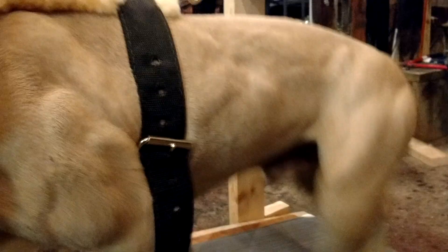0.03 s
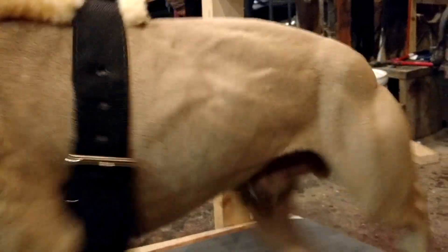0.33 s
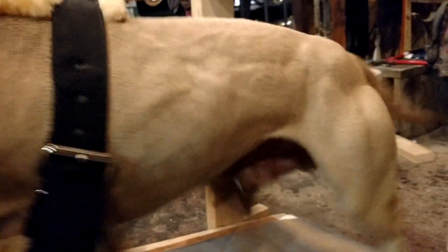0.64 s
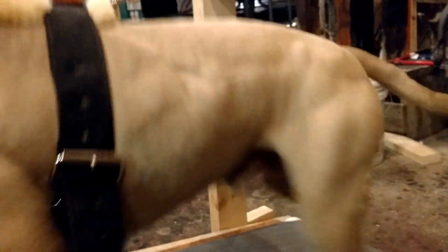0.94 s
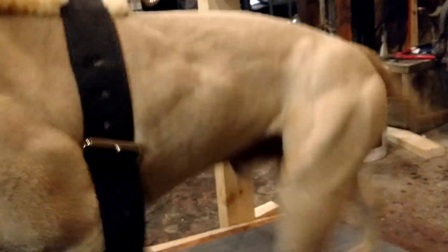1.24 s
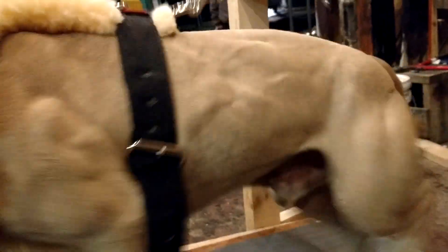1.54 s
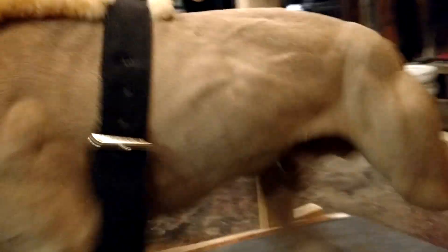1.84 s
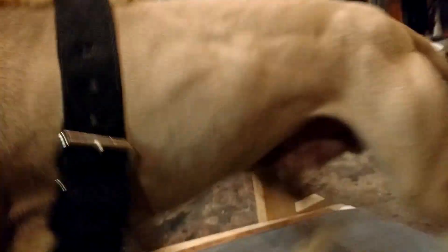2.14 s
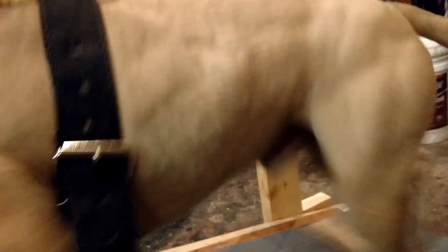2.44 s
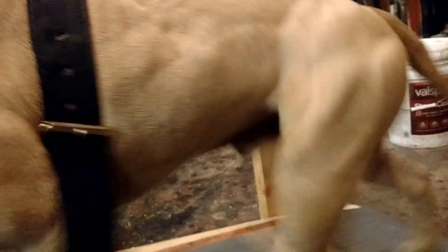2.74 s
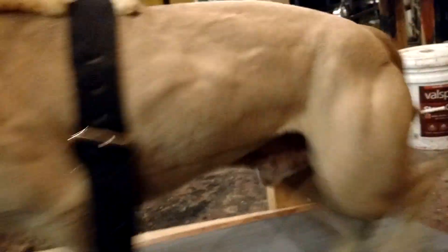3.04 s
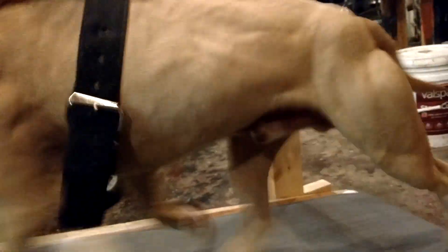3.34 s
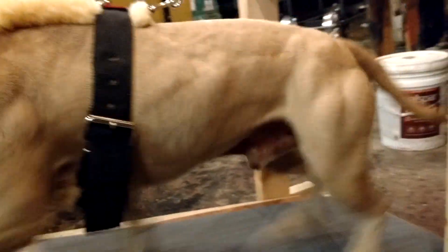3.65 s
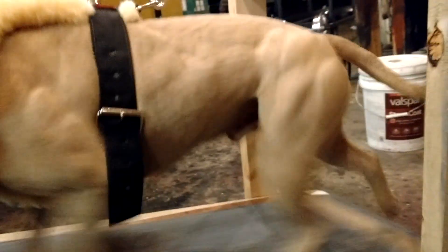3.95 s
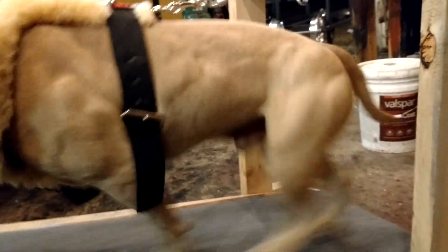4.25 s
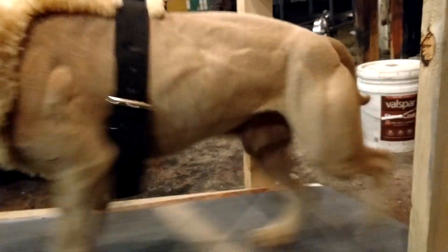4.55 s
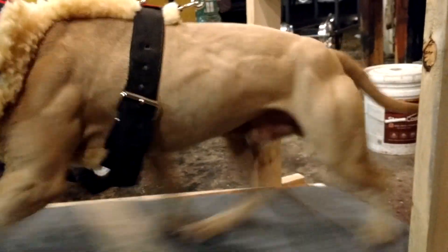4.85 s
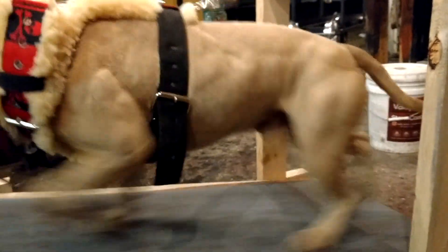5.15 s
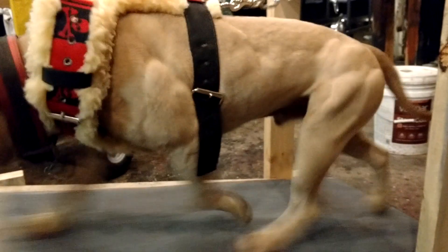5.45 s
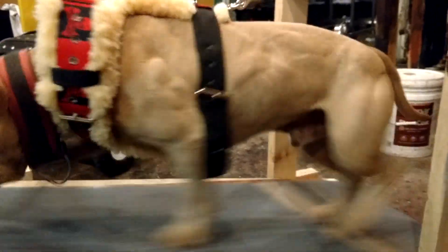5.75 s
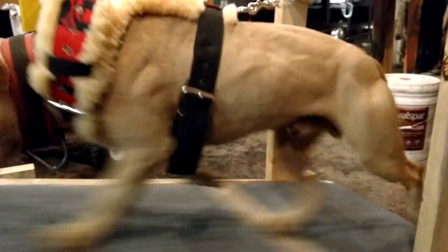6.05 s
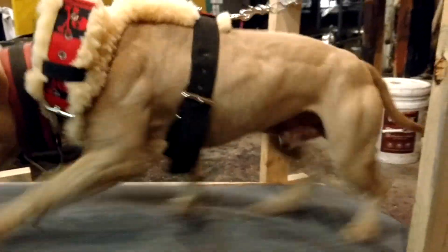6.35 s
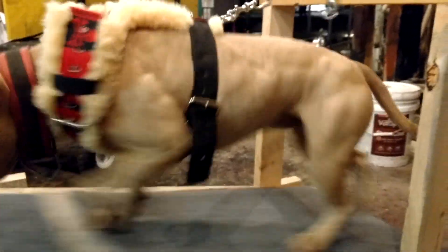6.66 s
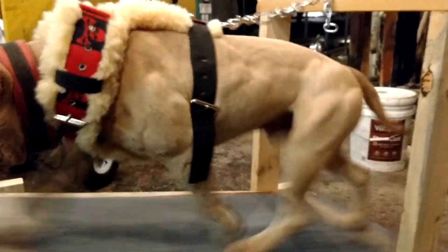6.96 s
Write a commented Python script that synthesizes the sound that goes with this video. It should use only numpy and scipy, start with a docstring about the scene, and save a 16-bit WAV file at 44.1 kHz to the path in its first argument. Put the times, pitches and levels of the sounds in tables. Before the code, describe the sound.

A dog trots on a loud, rattling treadmill, with quick rhythmic paw beats, belt hiss, and scattered clicks and knocks.

```python
"""Dog on a workshop treadmill.

A dog trots on a free-running belt that rattles over its wooden bed and hisses. Each paw drives the
rattle harder and scuffs; hard landings knock on the bed. Claws and harness hardware clack, steel rings
ping. The sound swells and drops abruptly about once a second. A close camera with a widened stereo
image draws back: the bass thins and the bed's boxy note comes forward."""
import sys
import numpy as np
from scipy import signal
from scipy.fft import rfft, irfft, next_fast_len
from scipy.io import wavfile
from scipy.ndimage import uniform_filter1d, map_coordinates

SR = 44100
rng = np.random.default_rng(int(sys.argv[2]) if len(sys.argv) > 2 else 0)


def pcm_store(signal):
    """Save signal as 16-bit PCM."""
    levels = np.round(np.clip(np.atleast_2d(signal), -1, 1) * 32767)
    wavfile.write(sys.argv[1], SR, levels.astype(np.int16).T)


N = 317079
TIME_S = np.arange(N) / SR


def amp(db):
    """Decibels to gain."""
    return 10 ** (np.asarray(db) / 20)


def unit_rms(x):
    """x scaled to rms 1."""
    return x / np.sqrt(np.mean(x ** 2) + 1e-20)


def at_hz(rows, hz):
    """(Hz, value) rows interpolated on a log frequency axis."""
    row_hz, values = np.transpose(rows)
    return np.interp(np.log(hz + 1), np.log(row_hz + 1), values)


def curve(rows):
    """(s, value) rows as one value per sample."""
    return np.interp(TIME_S, *np.transpose(rows))


def peak(hz, centre_hz, width_hz):
    """Resonance curve of height 1."""
    return 1 / (1 + (2 * (hz - centre_hz) / width_hz) ** 2)


def wobble(knots_per_s):
    """Smooth random curve."""
    return map_coordinates(rng.standard_normal(400), [TIME_S * knots_per_s], mode="mirror")


def filtered(x, response):
    """x through a frequency response."""
    size = x.shape[-1]
    padded = next_fast_len(size + 4096)
    hz = np.fft.rfftfreq(padded, 1 / SR)
    return irfft(rfft(x, padded) * response(hz), padded)[..., :size]


def patchy(x, depth_db, bands):
    """x under slow random patches of gain over time and frequency, at rms 1."""
    spectra = signal.stft(x, nperseg=512)[2]
    patches = uniform_filter1d(rng.standard_normal(spectra.shape[1:]), size=bands, axis=0)
    patches = unit_rms(uniform_filter1d(patches, size=12, axis=1))
    return unit_rms(signal.istft(spectra * amp(depth_db * patches))[1][:, :N])


# Likeness of the two microphones. Each row: frequency in Hz, coherence.
COHERENCE = [(30, 0.34), (70, 0.16), (150, 0.58), (500, 0.7), (800, 0.64), (1150, -0.33), (1600, -0.16),
             (5000, 0.068), (9000, -0.043)]

def noise(colour_db, size):
    """Coloured stereo noise of rms 1, most alike in the low mids."""
    def mid_side_gains(hz):
        angle = np.arccos(np.clip(at_hz(COHERENCE, hz), -1, 1)) / 2
        return amp(colour_db(hz)) * [np.cos(angle), np.sin(angle)]
    mid, side = filtered(rng.standard_normal((2, size)), mid_side_gains)
    return unit_rms(np.array([mid + side, mid - side]))


def tail(t60_rows, size):
    """Stereo impulse response of energy 1; each frequency dies at its own speed."""
    hz, t, spectra = signal.stft(noise(np.zeros_like, size), SR, nperseg=256)
    t60_s = at_hz(t60_rows, hz)[:, None]
    ring = signal.istft(spectra * amp(-60 * t / t60_s) / np.sqrt(t60_s), SR)[1]
    return unit_rms(ring) / np.sqrt(ring.shape[1])


def burst(colour_db, t60_s, attack_s, size):
    """Stereo noise with the energy of its envelope: quick rise, exponential decay."""
    t = np.arange(size) / SR
    envelope = amp(-60 * t / t60_s) * (1 - np.exp(-t / attack_s))
    return unit_rms(envelope * noise(colour_db, size)) * np.sqrt(np.mean(envelope ** 2))


def add_at(out, start_s, sound):
    """Mix sound into out, cut at the end."""
    span = out[:, round(start_s * SR):][:, :sound.shape[1]]
    span += sound[:, :span.shape[1]]


# Swells. Each row: start in s, first gain in dB, last gain in dB, bend (below 1 moves early, above 1
# late), length of the closing drop in s.
SWELLS = [(0.078, -36.5, -39, 0.79, 0.0094), (0.94, -44, -39.5, 0.7, 0.023),
          (1.44, -47.5, -35.5, 0.93, 0.045), (2.595, -46.5, -37, 0.6, 0.013),
          (3.657, -49, -38.5, 0.74, 0.017), (4.819, -48, -38, 0.39, 0.016), (5.903, -46.5, -36, 4.1, 0.013),
          (6.64, -41.5, -44.5, 0.92, 0.02)]

def swell_db(fade_db=24, fade_s=0.11):
    """Gain that fades in, then repeatedly climbs and drops; the last stretch sinks."""
    start_s, first_db, last_db, bend, drop_s = np.transpose(SWELLS)
    end_s = np.append(start_s[1:], N / SR)
    drop_db = np.append(last_db[:-1] - first_db[1:], 0)
    row = np.maximum(np.searchsorted(start_s, TIME_S) - 1, 0)
    progress = np.clip((TIME_S - start_s[row]) / (end_s - start_s)[row], 0, 1)
    dropping = np.clip(1 - (end_s[row] - TIME_S) / drop_s[row], 0, 1)
    db = first_db[row] + (last_db - first_db)[row] * progress ** bend[row] - drop_db[row] * dropping
    db -= fade_db * np.exp(-(TIME_S - start_s[0]) / fade_s)
    return np.where(TIME_S < start_s[0], -120, db)


# Paw landings, about 6.5 a second. Each row: time in s, relative weight in dB, hold in s.
PAWS = [(0.27, 0, 0.063), (0.36, 12, 0.023), (0.544, 13, 0.01), (0.707, 12, 0.033), (0.854, 15, 0.056),
        (1.007, 5, 0.033), (1.166, 9.5, 0.023), (1.326, 13, 0.013), (1.488, 13, 0.0053), (1.636, 15, 0.043),
        (1.75, 7, 0.085), (1.904, 9, 0.028), (2.043, 9.5, 0.026), (2.185, 8, 0.052), (2.33, 13.5, 0.021),
        (2.48, 9.5, 0.018), (2.658, 15.5, 0.015), (2.794, 15, 0.019), (2.951, 11.5, 0.008),
        (3.106, 8.5, 0.032), (3.261, 12, 0.048), (3.4, 13.5, 0.056), (3.563, 13, 0.0077),
        (3.72, 10.5, 0.047), (3.866, 8.5, 0.038), (4.003, 5, 0.01), (4.154, 12, 0.012),
        (4.306, 11.5, 0.015), (4.435, 11, 0.055), (4.613, 8, 0.0061), (4.775, 2, 0.094), (4.971, 13, 0.017),
        (5.095, 9, 0.083), (5.263, 12, 0.051), (5.401, 12.5, 0.015), (5.562, 11, 0.011), (5.653, 12, 0.092),
        (5.866, 13.5, 0.062), (6.029, 15.5, 0.046), (6.175, 12.5, 0.092), (6.313, 13, 0.13),
        (6.487, 13.5, 0.014), (6.647, 13, 0.054), (6.821, 14, 0.03), (6.966, 16.5, 0.067),
        (7.085, 16.5, 0.068)]

def paw_load(rise_s=0.0125, ease_s=0.047):
    """Power of the paws on the belt: the weight comes on, holds, eases off."""
    load = np.zeros(N)
    for land_s, db, hold_s in PAWS:
        near = slice(max(int((land_s - 0.1) * SR), 0), int((land_s + 0.5) * SR))
        age_s = TIME_S[near] - land_s
        falloff = np.where(age_s < 0, (age_s / rise_s) ** 2, np.maximum(age_s - hold_s, 0) / ease_s)
        load[near] += (amp(db) * np.exp(-falloff)) ** 2
    return load


# Ring of the bed. Each row: frequency in Hz, T60 in s.
BED_T60 = [(80, 0.57), (250, 0.11), (800, 0.09), (2500, 0.051), (10000, 0.11)]

def rattle(colour_db, taps_per_s, spread_db, spots):
    """Uneven taps on spots of the bed, each with its own ring; rms 1."""
    jitter, strength = rng.standard_normal((8000, 2)).T
    onsets = ((np.arange(len(jitter)) + 0.3 * jitter) * SR / taps_per_s).astype(int)
    struck_spot = rng.integers(spots, size=len(onsets))
    out = np.zeros((2, N))
    for spot in range(spots):
        here = (struck_spot == spot) & (onsets >= 0) & (onsets < N)
        taps = np.bincount(onsets[here], amp(spread_db * strength[here]), N)
        out += signal.oaconvolve(taps[None], tail(BED_T60, size=6000), axes=1)[:, :N]
    return unit_rms(filtered(out, lambda hz: amp(colour_db(hz))))


# Body of the bed. Each row: frequency in Hz, relative level in dB.
BED_SPECTRUM = [(25, -45), (48, -46), (72, -11), (115, -17), (170, 0), (260, 0.8), (450, -2.5), (780, 0.4),
                (1200, -4), (1800, -5), (2600, -8.5), (5000, -17), (9000, -32), (16000, -58)]
# Its resonances. Each row: centre in Hz, width in Hz, boost in dB.
BED_MODES = [(178, 25, 1), (247, 17.5, 3.5), (310, 26, 4), (408, 17, 7.5), (538, 50, 6), (628, 47, 4.5),
             (742, 23, 2.5), (858, 15, 5), (1015, 61, 5.5), (1235, 120, 5), (1632, 23, 5.5), (1956, 20, 2),
             (2330, 14, 6)]

def wood_db(hz):
    """Colour of the wooden bed: a broad body plus resonances."""
    modes_db = sum(db * peak(hz, centre_hz, width_hz) for centre_hz, width_hz, db in BED_MODES)
    return at_hz(BED_SPECTRUM, hz) + modes_db


def belt_rattle(load, roll_db=7.0, paw_db=0.06):
    """The belt rattles on the bed all the time, harder under a paw."""
    drive = np.sqrt(amp(roll_db) ** 2 + load * amp(paw_db) ** 2)
    taps = rattle(wood_db, taps_per_s=200, spread_db=2.5, spots=12)
    return drive * patchy(taps, depth_db=1.65, bands=4)


# Scuff colour. Each row: frequency in Hz, relative level in dB.
SCUFF_SPECTRUM = [(300, -48), (1200, 6.5), (2200, 16.5), (3200, 1.5), (4200, 10.5), (5500, 1.5), (7000, 7),
                  (9000, -57), (16000, -17)]
# Scuff strength. Each row: time in s, gain in dB.
SCUFF_GAIN = [(0.5, 0), (2.3, -2), (4.2, -8), (5.5, -4), (6.5, -13)]

def scuff(load, glide_db=-1.5, paw_db=-6.0, waver_db=2.0):
    """Grainy rubbing that grows as each paw scuffs along the belt."""
    drive = np.sqrt(amp(glide_db) ** 2 + load * amp(paw_db) ** 2)
    gain = amp(curve(SCUFF_GAIN) + waver_db * wobble(knots_per_s=21))
    grains = rattle(lambda hz: at_hz(SCUFF_SPECTRUM, hz), taps_per_s=170, spread_db=4.5, spots=10)
    return drive * gain * grains


# Hiss colour. Each row: frequency in Hz, relative level in dB.
HISS_SPECTRUM = [(200, -45), (3000, -8.5), (6000, -0.5), (9500, 3.5), (12500, 5), (15800, 3)]
# Hiss strength. Each row: time in s, gain in dB.
HISS_GAIN = [(0.2, -0.5), (0.55, 2), (0.9, -0.5), (1.4, 1.7), (1.9, -0.1), (2.5, 0.2), (2.75, 1.5),
             (3.6, 0), (3.8, -3), (4.3, -2), (4.36, 2.5), (4.6, 0.6), (4.78, -1), (5.0, -0.5), (5.13, -2.5),
             (5.3, -1), (5.48, 3), (5.77, 5), (5.9, 1.5), (6.17, 5), (6.3, -0.5), (6.58, 3), (6.72, -1.8),
             (7.0, 5)]

def belt_hiss(load, gain_db=2.18, paw_db=-17, waver_db=1.0, flutter_db=0.9):
    """The running belt hisses unevenly, harder under a paw."""
    drive = np.sqrt(1 + load * amp(paw_db) ** 2)
    flicker_db = waver_db * wobble(knots_per_s=9) + flutter_db * wobble(knots_per_s=45)
    hiss = patchy(noise(lambda hz: at_hz(HISS_SPECTRUM, hz), N), depth_db=1.84, bands=60)
    return drive * amp(gain_db + curve(HISS_GAIN) + flicker_db) * hiss


def treadmill():
    """Rattle, scuff and hiss under the same paws and swell, slightly to the right."""
    load = paw_load()
    belt = belt_rattle(load) + scuff(load) + belt_hiss(load)
    return belt * amp(swell_db()) * amp([[-0.3], [0.3]])


def claw_ticks(early_s=0.0125, window_s=0.088, over_swell_db=1, spread_db=1.5):
    """One faint claw contact at a random moment of each step, as (s, dB) rows."""
    steps_s = np.transpose(PAWS)[0]
    ticks_s = steps_s - early_s + window_s * rng.random(len(steps_s))
    ticks_db = np.interp(ticks_s, TIME_S, swell_db()) + rng.normal(over_swell_db, spread_db, len(ticks_s))
    return [(start_s, db) for start_s, db in zip(ticks_s, ticks_db) if 0 < start_s < N / SR]


# Buckle modes. Each row: frequency in Hz, relative level in dB.
BUCKLE_MODES = [(3250, 3.5), (4980, -15)]

def buckle_db(hz, pitch_spread=0.03, width_hz=600):
    """Colour of a struck buckle; its modes shift from blow to blow."""
    modes = sum(amp(db) * peak(hz, centre_hz * rng.normal(1, pitch_spread), width_hz)
                for centre_hz, db in BUCKLE_MODES)
    return 20 * np.log10(modes)


# Harness and claw contacts. Each row: start in s, relative level in dB.
CLACKS = [(0.270, -33), (0.319, -32), (0.354, -20.5), (0.380, -28), (0.575, -25.5), (0.706, -30),
          (0.782, -18.5), (0.8, -29), (0.9238, -20), (1.038, -28.5), (1.1535, -20), (1.272, -33),
          (1.292, -36), (1.476, -28.5), (1.4797, -28.5), (1.497, -30), (1.667, -34), (1.912, -35),
          (1.928, -32), (2.063, -33), (2.155, -32.5), (2.479, -30), (2.657, -38), (2.662, -24),
          (2.814, -34), (2.954, -28), (3.143, -33), (3.275, -30), (3.3654, -24), (3.388, -31), (3.416, -26),
          (3.426, -16), (3.434, -29), (3.489, -29), (3.571, -30), (3.607, -31), (3.638, -29),
          (3.717, -31.5), (4.007, -37), (4.139, -35), (4.147, -27.5), (4.218, -31), (4.234, -33),
          (4.3973, -23.5), (4.495, -32), (4.5606, -23.5), (4.606, -31.5), (4.722, -29.5), (4.773, -31),
          (4.797, -32.5), (4.847, -31.5), (4.9245, -32), (4.964, -28), (5.066, -30.5), (5.155, -34),
          (5.249, -27), (5.2537, -21.5), (5.358, -31), (5.411, -36), (5.433, -37), (5.4714, -27.5),
          (5.483, -36), (5.495, -31), (5.7138, -25), (5.776, -34), (5.863, -27), (5.887, -29),
          (6.09, -34.5), (6.174, -40), (6.2366, -34), (6.333, -36), (6.503, -44), (6.607, -25.5),
          (6.622, -22.5), (6.685, -33), (6.744, -29.5), (6.8226, -25), (6.832, -29), (6.971, -37)]
# Crack colour. Each row: frequency in Hz, relative level in dB.
CRACK_SPECTRUM = [(100, -43), (500, -50), (1100, 15.5), (1650, 9.5), (2500, 11), (3200, 5), (4200, 6.5),
                  (5200, 6.5), (7000, 4), (10000, -7.5), (16000, -10)]
# Recolouring of light contacts. Each row: frequency in Hz, change in dB per dB below hard_db.
DULLING = [(3400, 2.5), (7000, 1.87)]

def clacks(crack_db=7.0, clink_db=-2.0, hard_db=-24):
    """Each contact is a short crack, duller when light, and a rough clink of the buckle."""
    out = np.zeros((2, N))
    for start_s, db in CLACKS + claw_ticks():
        colour_db = lambda hz: at_hz(CRACK_SPECTRUM, hz) + max(hard_db - db, 0) * at_hz(DULLING, hz)
        crack = amp(crack_db) * burst(colour_db, t60_s=0.021, attack_s=0.0008, size=4000)
        clink = amp(clink_db) * burst(buckle_db, t60_s=0.044, attack_s=0.00094, size=4000)
        add_at(out, start_s, amp(db) * (crack + clink))
    return out


# Harness rings. Each row: start in s, relative level in dB, pitch in Hz, width in Hz.
PINGS = [(0.3545, -16, 4400, 700), (0.4607, -17, 7840, 2000), (0.924, -7.5, 1640, 500),
         (0.9245, -14, 6540, 800), (0.928, -5.5, 8700, 750), (1.1535, -23, 9550, 4000),
         (1.154, -13, 3200, 500), (2.48, -19, 7700, 1500), (3.143, -30, 7800, 3000),
         (3.366, -21, 8200, 700), (3.3665, -18, 4200, 600), (3.639, -16, 8100, 1000),
         (3.6395, -19, 4900, 800), (4.146, -19, 7260, 4500), (4.1465, -20, 5340, 700),
         (4.219, -25, 7000, 900), (4.3956, -26, 7800, 1500), (4.438, -26, 7450, 1200),
         (5.2545, -27, 8500, 6000), (5.4727, -19, 9300, 2000), (5.473, -20, 6900, 1200),
         (6.607, -37, 8200, 2500), (6.622, -22, 8440, 1200), (6.823, -11, 2190, 500)]

def pings():
    """Steel snaps against steel and rings very briefly, each time at its own pitch."""
    out = np.zeros((2, N))
    for start_s, db, pitch_hz, width_hz in PINGS:
        colour_db = lambda hz: 20 * np.log10(peak(hz, pitch_hz, width_hz))
        add_at(out, start_s, amp(db) * burst(colour_db, t60_s=0.012, attack_s=0.00099, size=3000))
    return out * amp([[3], [-7]])  # the harness is to the left


# Knocks of the belt on the bed. Each row: start in s, relative level in dB, the spot's note in Hz.
KNOCKS = [(0.381, -24.5, 905), (0.529, -18.5, 810), (0.557, -19, 480), (0.564, -19.5, 700),
          (0.57, -22, 950), (0.708, -19, 890), (0.864, -18, 513), (1.169, -24, 950), (1.323, -26, 750),
          (1.345, -20.5, 750), (1.479, -39, 900), (1.830, -24, 800), (1.901, -26.5, 260),
          (1.972, -25.5, 750), (2.021, -29, 905), (2.044, -25, 700), (2.059, -22, 420), (2.324, -25, 1040),
          (2.357, -23, 620), (2.437, -22.5, 1400), (2.497, -26, 900), (2.794, -22.5, 640),
          (2.961, -21, 825), (3.053, -24.5, 710), (3.089, -24, 870), (3.170, -24, 540), (3.276, -20.5, 650),
          (3.367, -20.5, 1220), (3.418, -22, 696), (3.563, -17, 1100), (3.573, -20.5, 700),
          (3.620, -21.5, 1000), (3.871, -30, 710), (3.996, -27.5, 710), (4.161, -28, 900),
          (4.456, -28.5, 690), (4.560, -26.5, 1000), (4.622, -23, 740), (4.790, -25, 700),
          (4.966, -26.5, 950), (5.118, -20.5, 730), (5.314, -24, 1140), (5.409, -22, 750),
          (5.555, -26.5, 413), (5.662, -24, 1140), (5.853, -24.5, 770), (5.881, -24, 920),
          (6.239, -24, 970), (6.877, -26, 734), (6.967, -25, 780), (7.015, -24, 730), (7.142, -30, 760)]
# A slap's tilt on the bed's colour. Each row: frequency in Hz, gain in dB.
SLAP_TILT = [(90, -12), (260, -3.5), (700, -3)]

def knocks(gain_db=0.5, note_db=6, width_hz=210):
    """A hard landing slaps the belt down and that spot of the bed rings briefly."""
    out = np.zeros((2, N))
    for start_s, db, note_hz in KNOCKS:
        colour_db = lambda hz: wood_db(hz) + at_hz(SLAP_TILT, hz) + note_db * peak(hz, note_hz, width_hz)
        knock = burst(colour_db, t60_s=0.058, attack_s=0.0008, size=8000)
        add_at(out, start_s, amp(db + gain_db) * knock)
    return out


# Workshop decay. Each row: frequency in Hz, T60 in s.
ROOM_T60 = [(100, 0.45), (1000, 0.053), (4000, 0.18), (12000, 0.073)]

def workshop(hits):
    """The room's short reverberation, longest in the bass."""
    return signal.oaconvolve(hits, tail(ROOM_T60, size=16000), axes=1)[:, :N]


# Bass and the bed's boxy note over time. Each row: time in s, gain in dB.
BASS_GAIN = [(0, 3), (2.6, 2), (4.2, -0.7), (7.2, -1.5)]
BOXY_GAIN = [(0, -3), (3, 1), (4.5, 3), (7.2, 5)]

def draw_back(sound, bass_edge_hz=1230):
    """Growing distance thins the bass and brings out the bed's boxy note."""
    bass = filtered(sound, lambda hz: 1 / (1 + (hz / bass_edge_hz) ** 4))
    boxy = filtered(sound, lambda hz: peak(hz, centre_hz=750, width_hz=75))
    return sound + (amp(curve(BASS_GAIN)) - 1) * bass + (amp(curve(BOXY_GAIN)) - 1) * boxy


def scene(room_db=-8):
    """Treadmill and hits from a growing distance; only the hits reverberate."""
    hits = clacks() + pings() + knocks()
    reverb = amp(room_db) * workshop(hits)
    return draw_back(treadmill() + hits + reverb)


# Stereo widening. Each row: frequency in Hz, ratio of crossed to direct signal.
CROSSFEED = [(600, 0), (1100, .8), (2000, .92), (4400, .86), (5400, .83), (6500, .56), (8300, .25),
             (9500, 0)]

def record(dry, low_cut_hz=58, cross_delay_s=0.000462, top_hz=15850):
    """The camera limits the band and subtracts a delayed copy of each channel from the other."""
    mics = signal.sosfilt(signal.butter(4, low_cut_hz, "highpass", fs=SR, output="sos"), dry)
    ratio = lambda hz: at_hz(CROSSFEED, hz)
    delay = lambda hz: np.exp(-2j * np.pi * hz * cross_delay_s)
    direct = filtered(mics, lambda hz: 1 / np.hypot(1, ratio(hz)))
    crossed = filtered(mics[::-1], lambda hz: ratio(hz) / np.hypot(1, ratio(hz)) * delay(hz))
    return filtered(direct - crossed, lambda hz: hz < top_hz)


dry = scene()
out = record(dry)
pcm_store(out)
```